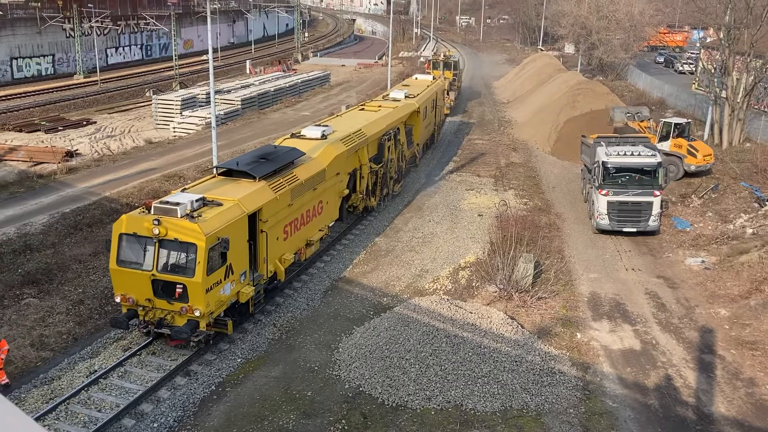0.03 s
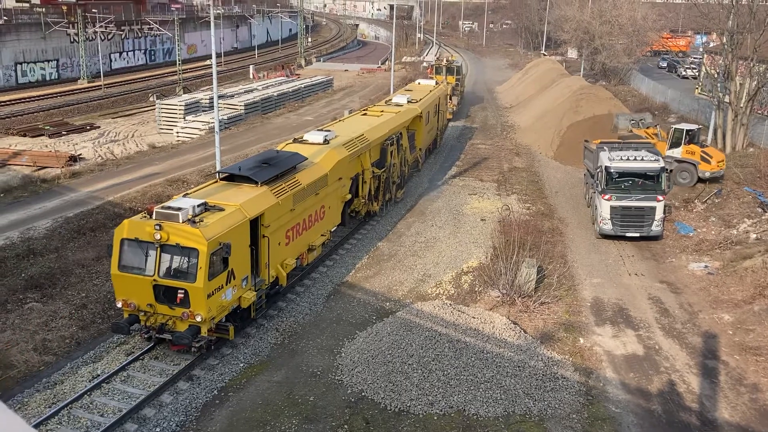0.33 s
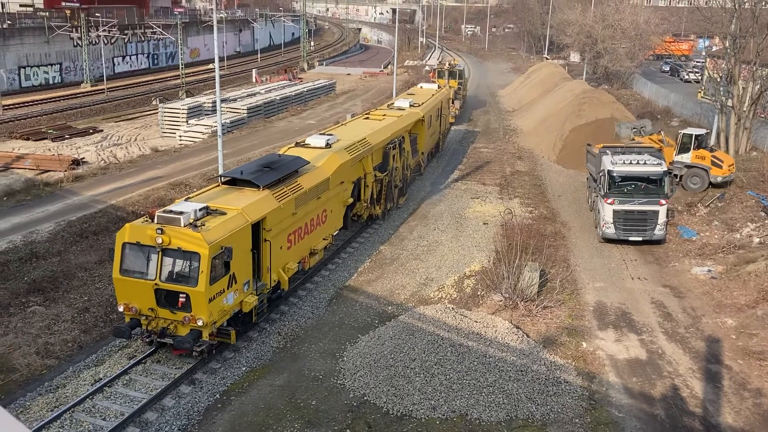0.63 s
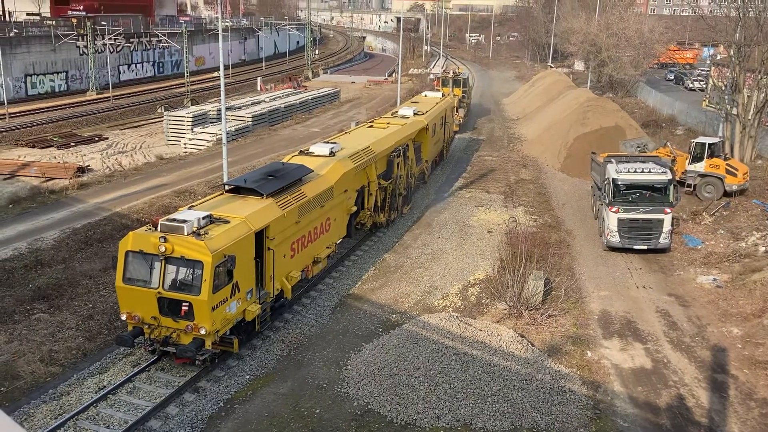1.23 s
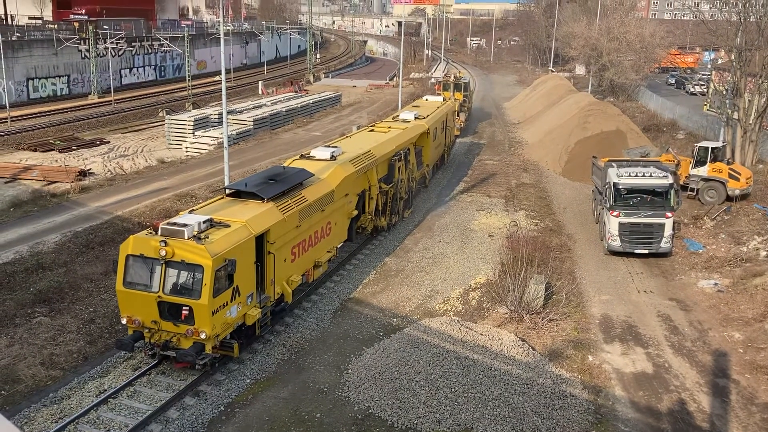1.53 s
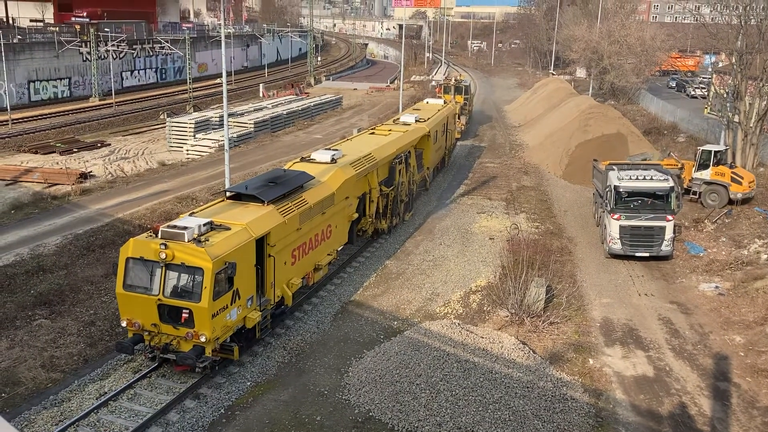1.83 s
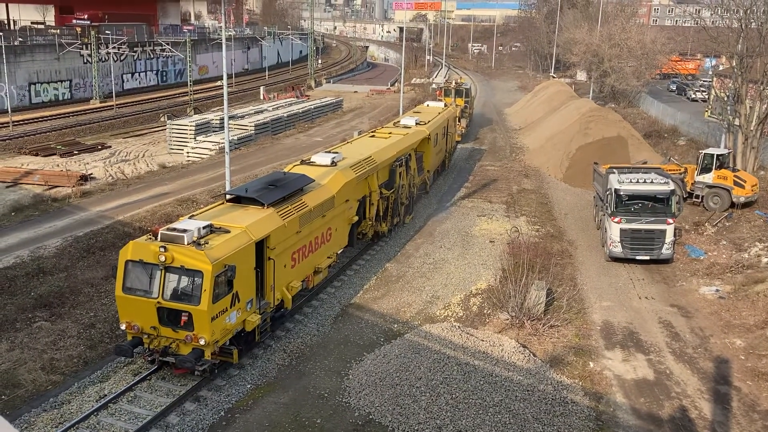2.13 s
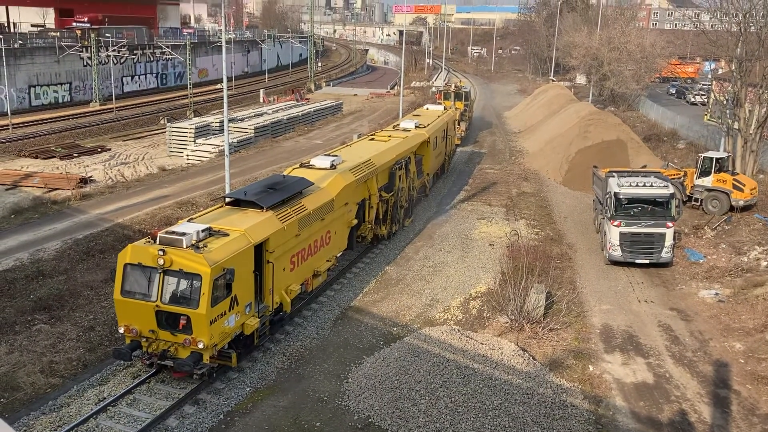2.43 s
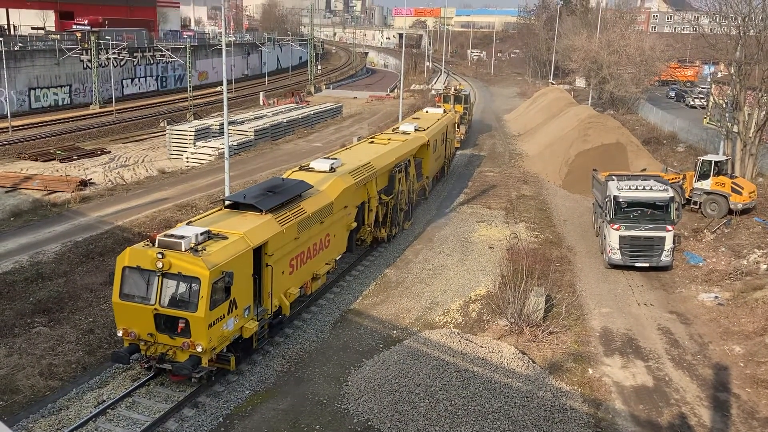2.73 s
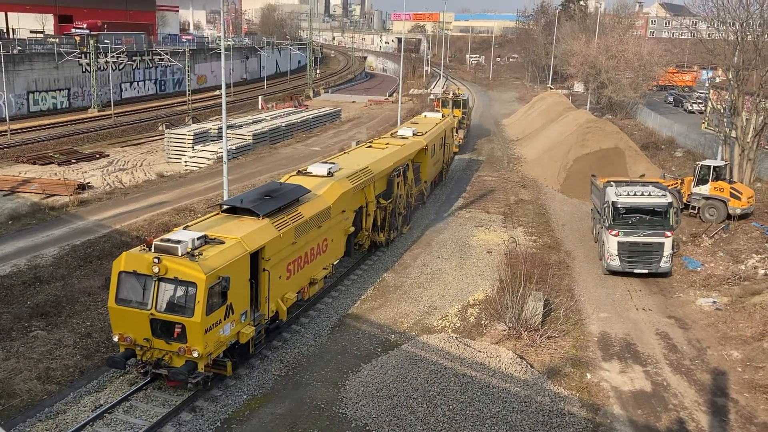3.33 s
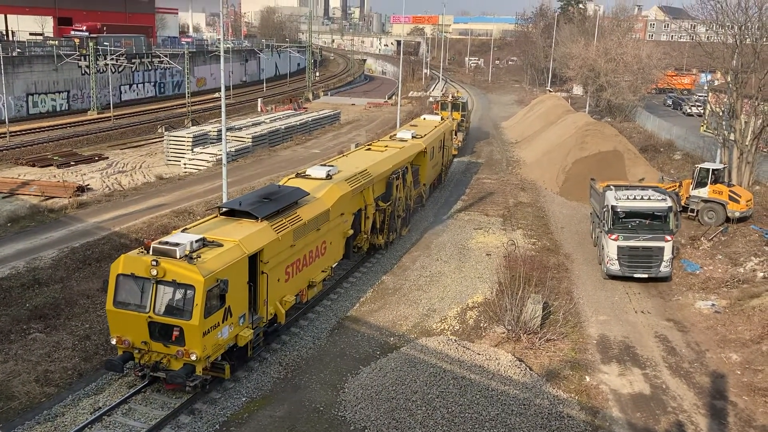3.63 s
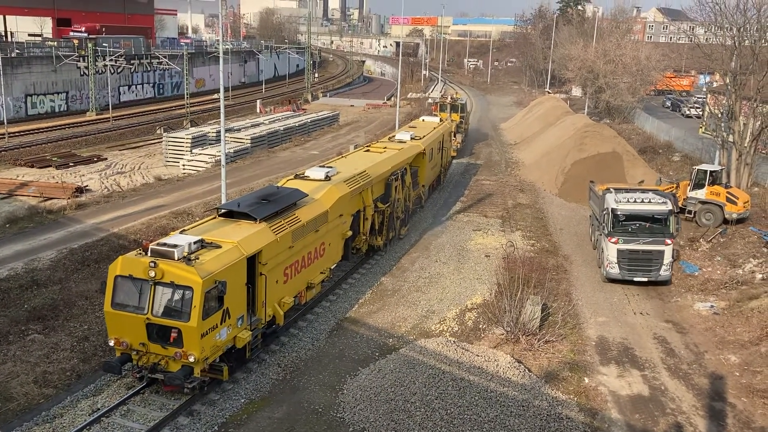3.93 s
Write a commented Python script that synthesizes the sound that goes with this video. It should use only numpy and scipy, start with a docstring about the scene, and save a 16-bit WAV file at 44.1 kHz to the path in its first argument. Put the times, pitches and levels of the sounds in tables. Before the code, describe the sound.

Diesel track tamper running with a thin whistle, crunching and rattling through ballast stones twice.

```python
"""A diesel drones under a thin turbo whistle, its pitch sagging with load: a track tamping machine
in an open railway yard, heard from above. Air hisses off to the left, and a wheel loader growls further
off, over the wash of fans and traffic. Twice the tines plunge hissing into the ballast, squeeze it with
a fast rattle and lift out. The drone is a harmonic series, whistle and growl are resonant noise,
and the ballast is a dense stream of random impacts."""
import sys
import numpy as np
from scipy import signal
from scipy.fft import rfft, irfft
from scipy.io import wavfile

SR = 44100
rng = np.random.default_rng(int(sys.argv[2]) if len(sys.argv) > 2 else 0)


def persist_wave(psi):
    """Save psi, clipped to +-1, as 16-bit WAV."""
    counts = np.round(np.clip(psi, -1, 1) * 32767).astype(np.int16)
    wavfile.write(sys.argv[1], SR, np.atleast_2d(counts).T)


N = 176400
TIME, FREQ = np.arange(N) / SR, np.fft.rfftfreq(N, 1 / SR)


def amp(db):
    """Amplitude ratio: tenfold for every 20 dB."""
    return 10 ** (np.asarray(db) / 20)


def unit(x):
    """Normalisation to an rms of 1."""
    return x / np.sqrt(np.mean(x ** 2) + 1e-20)


def curve(rows, column=1):
    """Linear interpolation of one column over time."""
    rows = np.array(rows)
    return np.interp(TIME, rows[:, 0], rows[:, column])


def spectrum(rows):
    """Interpolation of a table over log frequency."""
    hz, value = np.transpose(rows)
    return np.interp(np.log(FREQ + 1), np.log(hz + 1), value)


def drift(cutoff_hz):
    """Random fluctuation: low-passed noise of rms 1."""
    return unit(irfft(rfft(rng.standard_normal(N)) / (1 + (FREQ / cutoff_hz) ** 4), N))


def narrowband(hz, width_hz):
    """Resonance: two independent noises pass a double pole and are shifted up to hz."""
    pole = np.exp(-np.pi * width_hz / SR)
    noise = rng.standard_normal((2, N)) + 1j * rng.standard_normal((2, N))
    envelope = signal.lfilter([1], [1, -2 * pole, pole * pole], noise)
    carrier = np.exp(2j * np.pi * np.cumsum(hz * np.ones(N)) / SR)
    return unit((envelope * carrier).real)


# colour of the yard, shared by all broadband sounds (frequency [Hz], spectral density [dB])
YARD_SPECTRUM = [(20, -80), (32, -68), (42, -49), (80, -56), (130, -55.5), (240, -53), (300, -56),
                 (345, -49.5), (490, -54), (570, -58), (690, -55.5), (760, -50.5), (885, -57.5),
                 (1050, -51), (1520, -56), (1700, -53.5), (2000, -58), (2400, -63), (2950, -69),
                 (3500, -62), (4000, -64.5), (4900, -68), (5600, -75), (6600, -74.5), (7600, -79.5),
                 (9800, -80), (11500, -86), (12500, -87.5), (15500, -107)]
# resonances of the machine's panels (frequency [Hz], bandwidth [Hz], gain [dB])
PANEL_MODES = [(405, 14, 0.5), (476, 34, 4.5), (760, 13, 0), (1060, 98, 0.5), (1344, 21, -3.5),
               (1368, 60, 3), (1976, 42, 4.5), (2300, 110, 4), (3910, 130, 2), (4480, 120, 2.5)]
def coloured(white, tone):
    """Filters in cascade: the decibels of yard, panels and the source's own tone add."""
    ring_db = sum(db / (1 + (2 * (FREQ - hz) / width) ** 2) for hz, width, db in PANEL_MODES)
    gain = amp(spectrum(YARD_SPECTRUM) + ring_db + spectrum(tone))
    return irfft(rfft(white) * gain, N) * np.sqrt(SR / 2)


# engine speed (time [s], firing rate [Hz])
FIRING_RATE = [(0, 131.2), (.4, 130.2), (.7, 129.5), (1.1, 129.4), (1.7, 128.7), (2.3, 127.5), (2.6, 126.8),
               (3.5, 127.2), (3.75, 127.6), (4, 131.2)]
# harmonics of the engine cycle (order, level running free [dB], level under load [dB])
HARMONICS = [(4, -37.5, -39), (5, -36.5, -34.5), (6, -27.5, -29), (7, -33, -35), (8, -18, -18),
             (10, -33, -30.5), (11, -38, -32), (12, -29, -29), (13, -74, -50), (14, -24, -26),
             (15, -31.5, -33), (16, -40.5, -29), (18, -45, -39.5)]
# throb of the firing harmonic (time [s], gain [dB])
FIRING_THROB = [(0, -3), (.07, 0.5), (.22, -2), (.36, .5), (.5, .8), (.76, -3.5), (.84, 0.5), (.94, -2.2),
                (1.16, 3), (1.225, -3.5), (1.32, 3), (1.4, -3), (1.47, 2.5), (1.54, -3.5), (1.62, 0),
                (1.74, 1), (1.78, -5.5), (1.84, -0.5), (2.28, 2), (2.6, 0.7), (2.8, 0.2), (2.87, 1.5),
                (3.01, -3.5), (3.1, 2), (3.22, 2.3), (3.33, -3.5), (3.39, 2), (3.49, 1.5), (3.57, -2.5),
                (3.65, 1.8), (3.85, -2), (4, -1.5)]
# a strong overtone comes and goes (time [s], gain [dB])
OVERTONE_SWELL = [(0, -.5), (.5, 2.5), (.72, -4.5), (.9, -1), (1.3, 1), (1.41, -3.5), (1.55, 1), (1.9, 2),
                  (2.1, 3), (2.45, -4), (2.58, 2), (2.72, -5), (3.1, -8.5), (3.4, 3), (3.56, -4), (3.66, 0),
                  (4, 2.5)]
def diesel(cylinders=8, free_hz=129.2, loaded_hz=127.7):
    """Periodic firing gives a harmonic series, whose balance shifts as load pulls the speed down."""
    waver_db, waver_rad, waver_hz = 0.63, 0.029, 13.4
    uneven_db = 1.64  # uneven combustion shakes the weaker harmonics
    firing_hz = curve(FIRING_RATE)
    load = np.clip((free_hz - firing_hz) / (free_hz - loaded_hz), 0, 1)
    cycle_phase = 2 * np.pi * np.cumsum(firing_hz / cylinders) / SR
    swings = {cylinders: FIRING_THROB, 14: OVERTONE_SWELL}  # by order
    drone = np.zeros(N)
    for order, free_db, loaded_db in HARMONICS:
        swing_db = curve(swings[order]) if order in swings else uneven_db * drift(waver_hz)
        level = amp(free_db + (loaded_db - free_db) * load + swing_db + waver_db * drift(waver_hz))
        phase = order * cycle_phase + 2 * np.pi * rng.random() + waver_rad * drift(waver_hz)
        drone += level * np.sin(phase)
    return np.sqrt(2) * drone


# turbocharger whistle (time [s], frequency [Hz], level [dB])
TURBO_WHISTLE = [(0, 8560, -41), (.35, 8440, -44), (.55, 8500, -39), (.8, 8350, -44), (1.2, 8360, -38.5),
                 (1.6, 8526, -40.5), (2, 8605, -41), (2.5, 8830, -42), (3, 9050, -47), (3.65, 9050, -42),
                 (4, 8895, -45)]
def turbo(skirt_db=-2):
    """Narrowband noise is heard as a pitch: a whistle in a wider skirt of rushing air."""
    hz = curve(TURBO_WHISTLE)
    whistle = narrowband(hz, width_hz=61)
    skirt = amp(skirt_db) * narrowband(hz, width_hz=795)
    return amp(curve(TURBO_WHISTLE, column=2)) * (whistle + skirt)


# tone of the intake air (frequency [Hz], gain [dB])
INTAKE_SPECTRUM = [(100, -53), (1500, -10), (3600, -11.5), (6500, -4.5), (12000, -20)]
def intake(db_per_hz=0.3, reference_hz=9054):
    """Flow noise grows with speed: air hisses harder as the turbocharger spins up."""
    level = amp(db_per_hz * (curve(TURBO_WHISTLE) - reference_hz) + 2.5 * drift(20))
    return coloured(rng.standard_normal((2, N)) * level, INTAKE_SPECTRUM)


# swell of the machine's roar (time [s], level [dB])
ROAR_LEVEL = [(0, -3.5), (.25, -2), (.45, 1.5), (.9, 1), (1.25, -8), (1.45, -1.5), (1.8, 2), (1.95, -5),
              (2.4, -9), (2.55, 0.5), (2.9, -5), (3.22, -17), (3.36, -0.5), (3.5, -5), (3.85, -5.5),
              (4, -1)]
# its low-mid tone (frequency [Hz], gain [dB])
ROAR_SPECTRUM = [(150, -6.5), (290, -8), (350, -3), (500, -0.5), (700, -1.5), (1100, -7.5), (2500, -12)]
def roar():
    """Noise under a slow envelope: a hollow roar swells and sinks with the work."""
    return coloured(rng.standard_normal((2, N)) * amp(curve(ROAR_LEVEL)), ROAR_SPECTRUM)


# tone of the escaping air (frequency [Hz], gain [dB])
LEAK_SPECTRUM = [(100, -27), (650, -9), (1200, -12), (2100, -4), (2700, -2.5), (3300, -4), (4200, -5),
                 (5600, 4.5), (6600, -10), (7500, -27), (12000, -35)]
def air_leak(gain_db=-4.5, coherence=0.64, lag_s=0.0001):
    """Path difference: compressed air hissing on the left reaches the right microphone later."""
    left, independent = coloured(rng.standard_normal((2, N)), LEAK_SPECTRUM)
    delayed = irfft(rfft(left) * np.exp(-2j * np.pi * FREQ * lag_s), N)
    right = coherence * delayed + np.sqrt(1 - coherence ** 2) * independent
    return amp(gain_db) * np.array([left, right])


# effort of the wheel loader (time [s], gain [dB])
LOADER_EFFORT = [(0, -7), (.5, -12), (.8, -8), (1.7, -11.5), (2.05, -1), (2.45, -6.5), (2.8, -9),
                 (2.93, 10), (3.06, -1.5), (3.37, -2), (3.55, -2.5), (3.75, 1), (4, 3)]
# its exhaust resonances (frequency [Hz], bandwidth [Hz], level [dB])
EXHAUST_MODES = [(121, 7.3, -35), (170.6, 15, -32.5), (208, 31, -38), (237.7, 18.5, -29), (283, 10.6, -40)]
def loader():
    """Exhaust resonances driven by noise make a rough growl that grows with effort."""
    growl = sum(amp(db) * narrowband(hz, width) for hz, width, db in EXHAUST_MODES)
    return amp(curve(LOADER_EFFORT)) * growl


# tone of fans and traffic (frequency [Hz], gain [dB])
WASH_SPECTRUM = [(30, -1.5), (100, 1), (250, -0.5), (420, -4), (750, -6.5), (1200, -4), (2400, -4.5),
                 (3400, -5.5), (4400, -14), (6000, -9.5), (7200, -5), (12000, -2)]
def wash(waver_db=1.27):
    """Incoherent sources, cooling fans and far traffic, merge into one gently uneven noise."""
    return coloured(rng.standard_normal((2, N)) * amp(waver_db * drift(1.2)), WASH_SPECTRUM)


def stroke(start, rise_s, hold_s, fade_db_per_s):
    """Envelope with a smooth rise and an exponential decay that begins hold_s after the start."""
    age = TIME - start
    rise = np.sin(np.pi / 2 * np.clip(age / rise_s, 0, 1))
    return rise * amp(-fade_db_per_s * np.maximum(age - hold_s, 0))


def stones(clicks_per_s=2500, spread_db=2.5, click_share=0.54):
    """Shot noise: random clicks of stone on stone share their power with a grinding hiss."""
    size = amp(spread_db * np.minimum(rng.exponential(1, (2, N)), 5))
    clicks = size * rng.choice([-1, 1], (2, N)) * (rng.random((2, N)) < clicks_per_s / SR)
    hiss = rng.standard_normal((2, N))
    return np.sqrt(click_share) * unit(clicks) + np.sqrt(1 - click_share) * hiss


# tines enter the ballast (time [s], level [dB], hold [s], decay of the scrape [dB/s])
PLUNGE_STROKES = [(0.487, 0, 0.13, 11.5), (2.307, -2.5, 0.15, 58)]
# tone of a plunge (frequency [Hz], gain [dB])
PLUNGE_SPECTRUM = [(100, -28), (400, -12.5), (1200, -1.5), (2200, 0.5), (3600, 3.5), (6500, 7),
                   (12000, 5.5)]
def plunges(rise_s=0.11, rush_fade_db_per_s=103):
    """Two-slope decay: a bright rush of stones as the tines go in falls to a lingering scrape."""
    scrape_ratio = amp(8.5)
    level = np.zeros(N)
    for start, db, hold, scrape_fade in PLUNGE_STROKES:
        rush = stroke(start, rise_s, hold, rush_fade_db_per_s)
        scrape = scrape_ratio * stroke(start, rise_s, hold, scrape_fade)
        level += amp(db) * (rush + scrape) / (1 + scrape_ratio)
    return coloured(stones() * level, PLUNGE_SPECTRUM)


# tines squeeze (time [s], hold [s], level [dB], decay [dB/s], rattle depth [0-1], tilt [dB/octave])
SQUEEZE_STROKES = [(1.0, 0.45, 0.5, 25.5, 0.2, -.2), (2.727, 0.45, -2, 41, 0.39, -0.25),
                   (3.246, 0.19, -5, 95, 0.16, -0.2)]
# tone of a squeeze (frequency [Hz], gain [dB])
SQUEEZE_SPECTRUM = [(100, -24), (400, -1.5), (750, -2.5), (1200, 1.5), (2200, 1.5), (3600, -.8), (6500, 3),
                    (12000, 1)]
def squeeze(start, hold, db, fade, depth, tilt):
    """Amplitude modulation: stones crunch in time with the vibrating tines."""
    rise_s, tine_hz, uneven_db, pivot_hz = 0.12, 41.3, 0.7, 1501
    rattle = (1 + depth * np.sin(2 * np.pi * tine_hz * TIME)) / np.sqrt(1 + depth ** 2 / 2)
    level = amp(db + uneven_db * drift(tine_hz / 3)) * stroke(start, rise_s, hold, fade)
    tone = [(hz, gain_db + tilt * np.log2(hz / pivot_hz)) for hz, gain_db in SQUEEZE_SPECTRUM]
    return coloured(stones() * level * rattle, tone)


# tines lift out (time [s], level [dB], hold [s])
LIFT_STROKES = [(1.56, -7, 0.36), (3.564, -9, 0.26)]
# tone of the sliding stones (frequency [Hz], gain [dB])
LIFT_SPECTRUM = [(100, -28), (500, -4), (1200, -3.5), (2200, 6), (3600, 2.5), (6500, 6.5), (12000, 5)]
def lifts(rise_s=0.25, fade_db_per_s=39, flicker_db=0.83):
    """Weaker impacts make a soft trickle as the ballast slides back."""
    level = sum(amp(db) * stroke(start, rise_s, hold, fade_db_per_s) for start, db, hold in LIFT_STROKES)
    return coloured(stones() * level * amp(flicker_db * drift(21)), LIFT_SPECTRUM)


def echoes(x, count=14, first_s=0.002, spread_s=0.03, gain_db=-11.5, above_hz=600):
    """Comb filtering: short reflections interfere with the direct sound in the middle and treble."""
    delays = first_s + spread_s * rng.random(count)
    gain = amp(gain_db) * FREQ ** 4 / (FREQ ** 4 + above_hz ** 4)
    comb = np.exp(-2j * np.pi * FREQ * delays[:, None]).sum(0) / np.sqrt(count)
    return irfft(rfft(x) * (1 + gain * comb) / np.sqrt(1 + gain ** 2), N)


def placed(x, lead_rad, balance_db):
    """Differences of phase and level set a low drone between the microphones."""
    side = np.array([[.5], [-.5]])
    return (signal.hilbert(x) * np.exp(1j * lead_rad * side)).real * amp(balance_db * side)


# likeness of the two microphone signals (frequency [Hz], coherence [0-1])
COHERENCE = [(100, 0.74), (270, 1), (600, 0.74), (880, 0.57), (1200, 0.83), (2200, 0.91), (2900, 0.21),
             (3600, 0.75), (5000, 0.68), (5800, 0.43), (6500, 1), (7400, 0.7), (7900, 1), (9300, 1),
             (10200, 0.87), (11300, 0.74), (13500, 0.78)]
# lead of left over right (frequency [Hz], phase [rad])
PHASE_LEAD = [(100, 0), (450, -.25), (1300, .5), (2000, .45), (2600, .9), (3150, .1), (3700, .6),
              (4800, .25), (5400, .7), (6200, -.1), (7500, 0), (8000, -1.6), (9000, -3.1), (9500, -3.2),
              (10700, -6.1), (12300, -6.3), (12700, -9.2)]
# left minus right (frequency [Hz], level difference [dB])
BALANCE = [(100, .2), (260, .3), (480, -1.4), (850, -.8), (1300, 1), (2000, .5), (3800, 1.2), (6200, .2),
           (12000, -.1)]
def microphones(pair):
    """Partial coherence: two independent channels blend into a partly alike left and right."""
    left, independent = rfft(pair)
    coherence = spectrum(COHERENCE)
    right = coherence * left + np.sqrt(1 - coherence ** 2) * independent
    right *= np.exp(-1j * spectrum(PHASE_LEAD))
    lean = amp(spectrum(BALANCE) / 2)
    return irfft(np.array([left * lean, right / lean]), N)


def scene():
    """Superposition: machine, loader and yard add at the microphones."""
    tamping = plunges() + sum(squeeze(*row) for row in SQUEEZE_STROKES) + lifts()
    noises = echoes(wash() + tamping + intake()) + roar() + turbo() + loader()
    drone = placed(diesel(), lead_rad=-0.37, balance_db=0.25)
    return drone + microphones(noises) + air_leak()


def record(dry, cutoff_hz=12600):
    """Band limiting: a low-pass filter removes the highest treble."""
    lowpass = signal.firwin(255, cutoff_hz, window=("kaiser", 8), fs=SR)
    return signal.oaconvolve(dry, lowpass[None], "same")


dry = scene()
out = record(dry)
persist_wave(out)
```